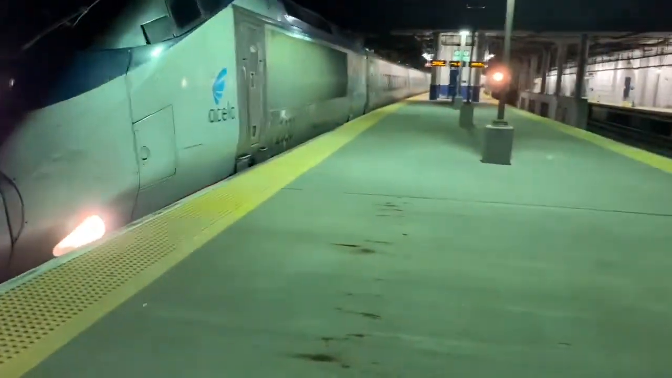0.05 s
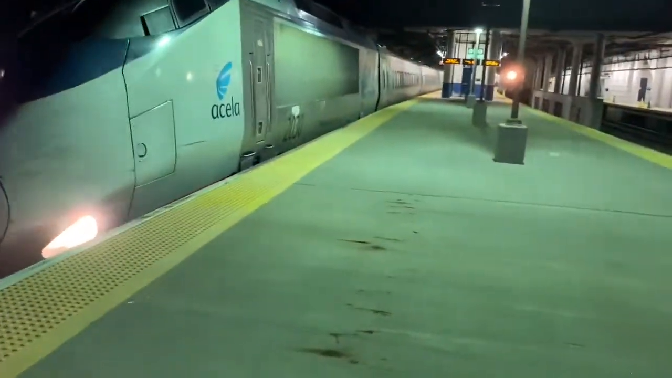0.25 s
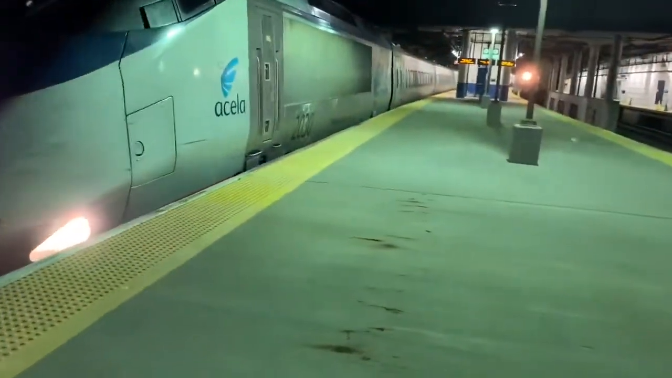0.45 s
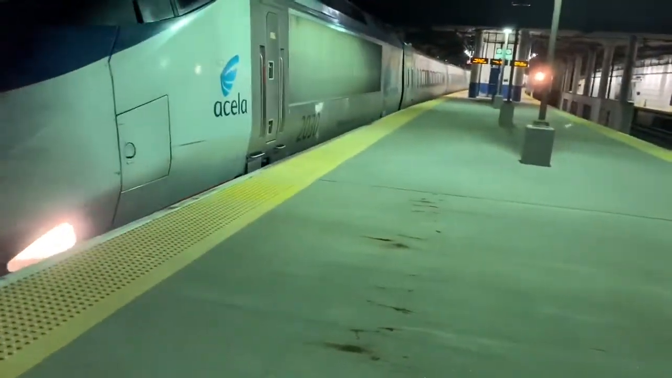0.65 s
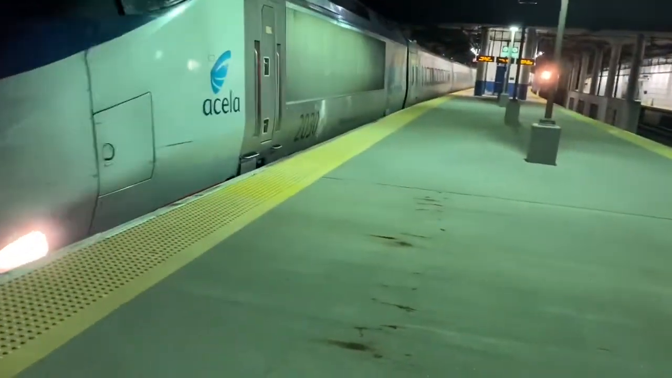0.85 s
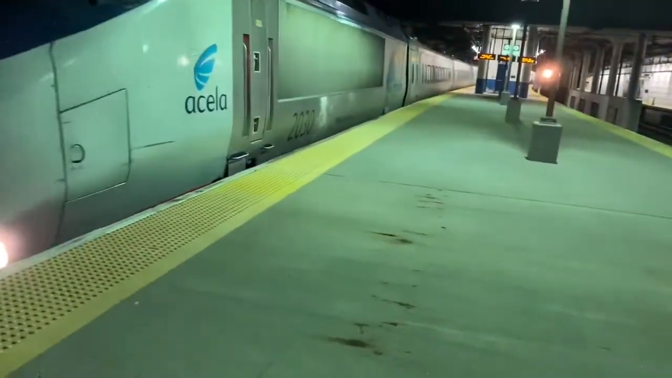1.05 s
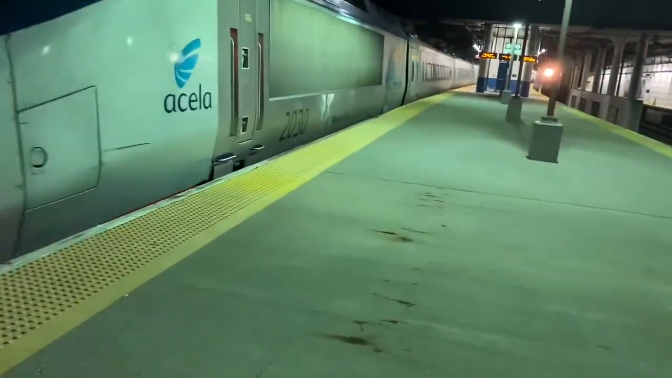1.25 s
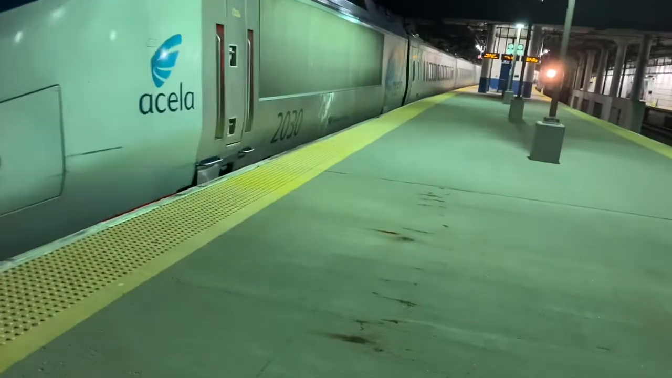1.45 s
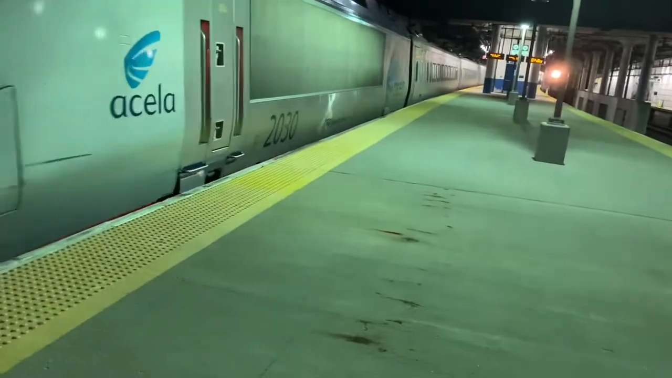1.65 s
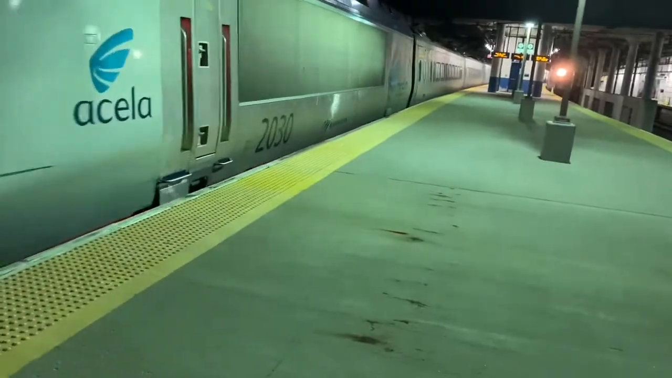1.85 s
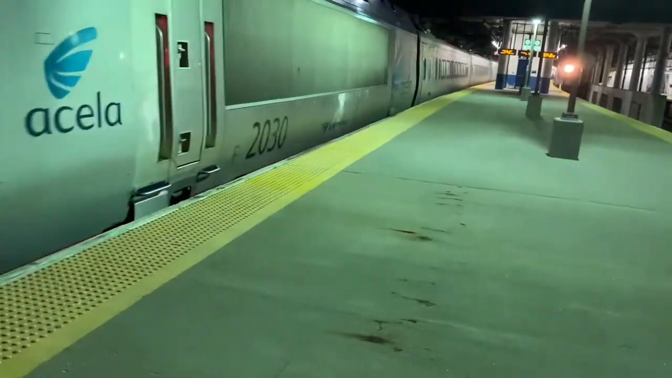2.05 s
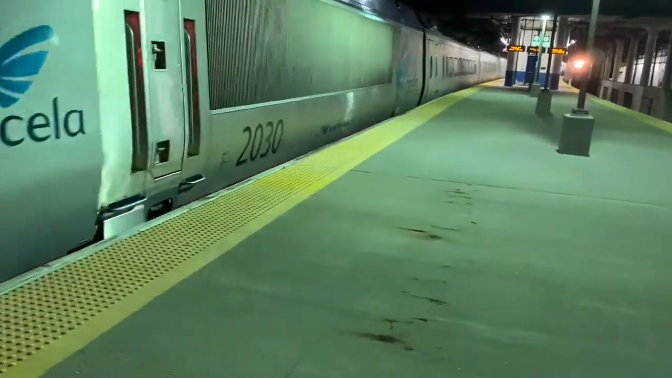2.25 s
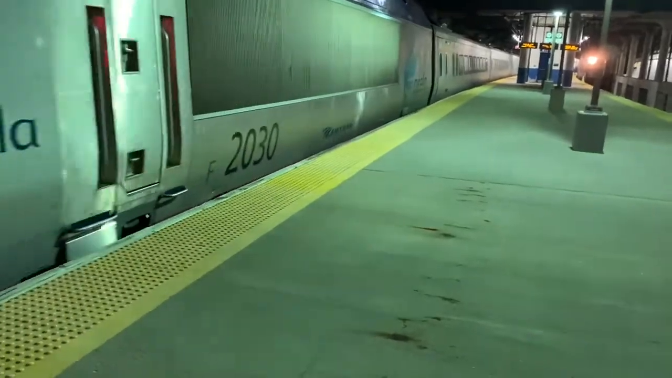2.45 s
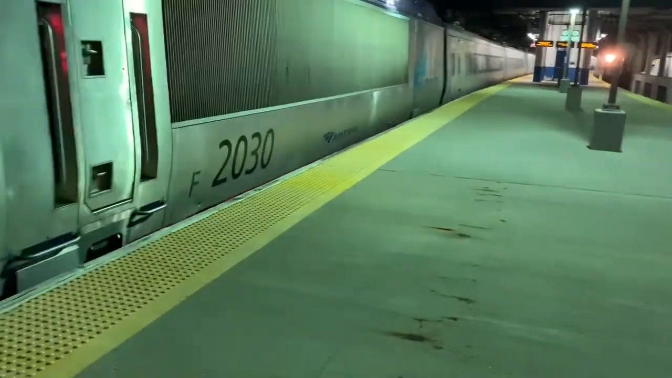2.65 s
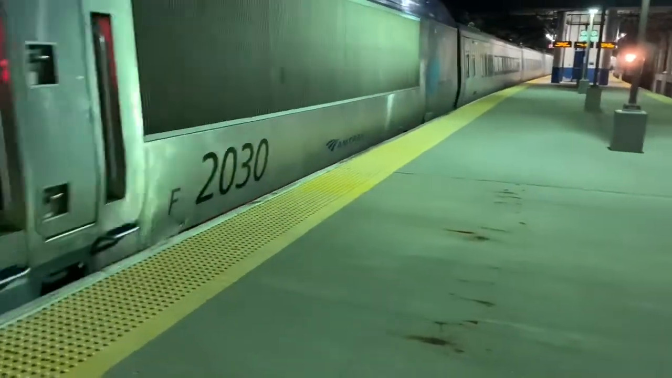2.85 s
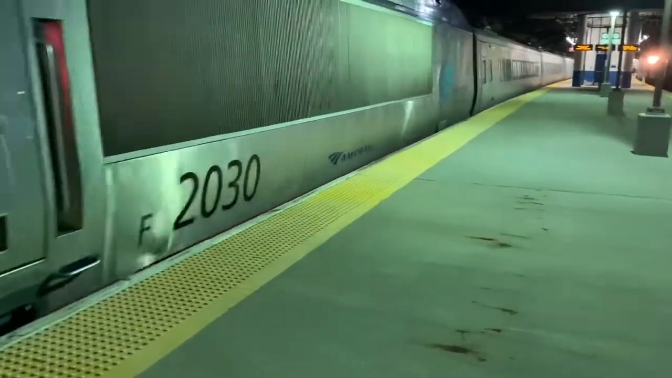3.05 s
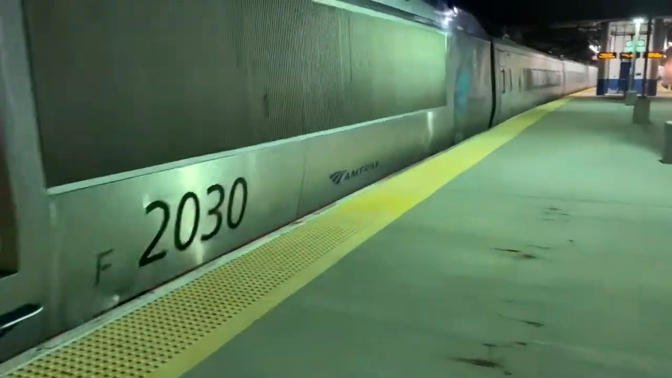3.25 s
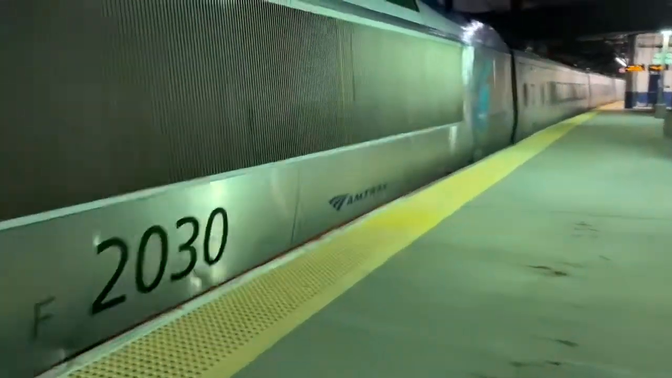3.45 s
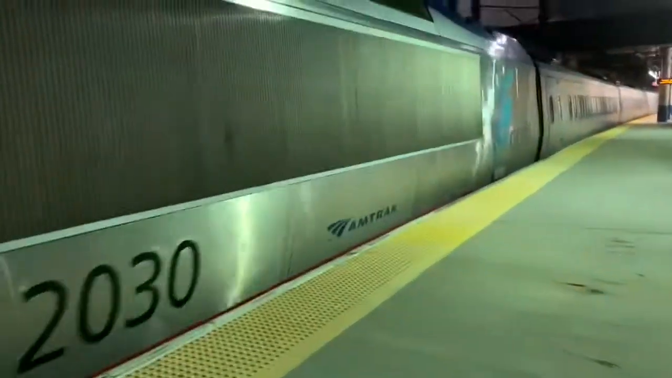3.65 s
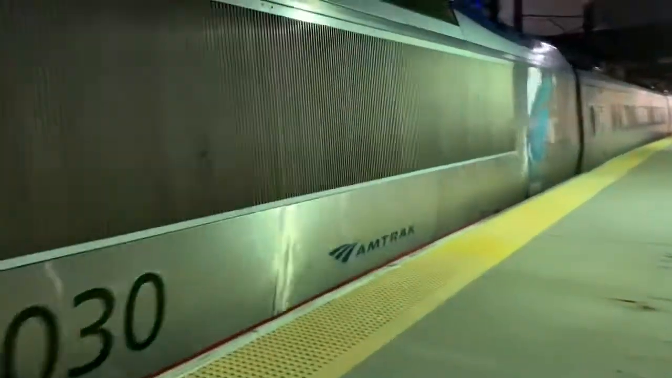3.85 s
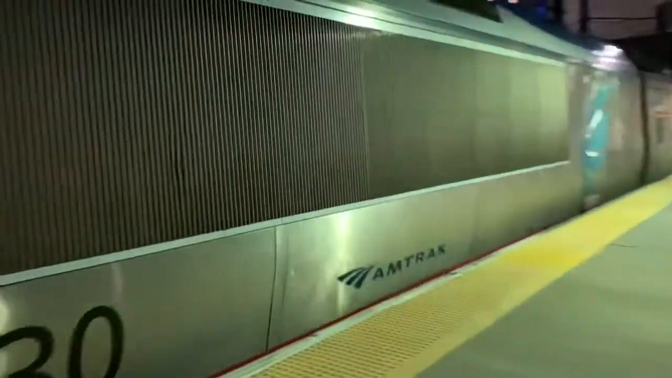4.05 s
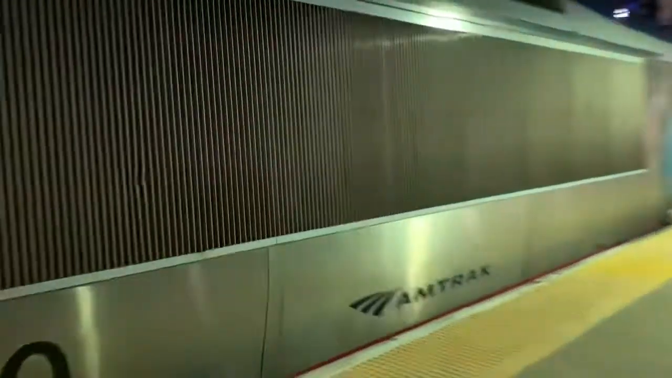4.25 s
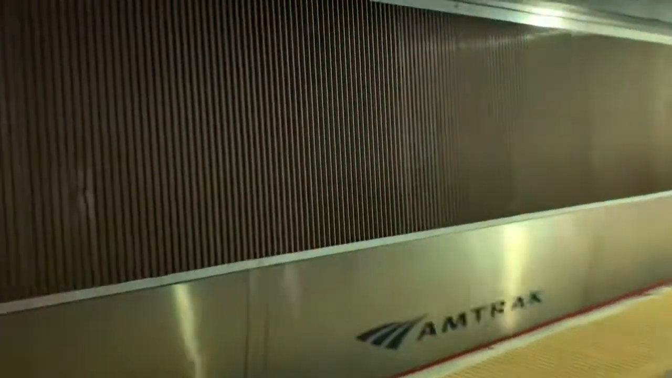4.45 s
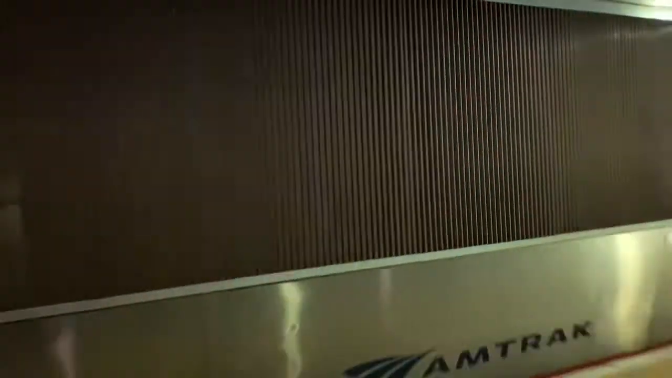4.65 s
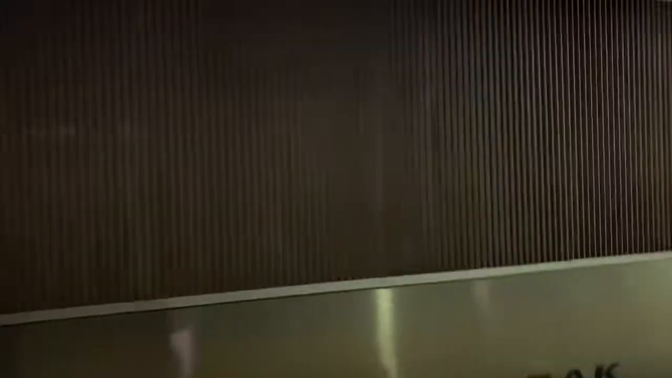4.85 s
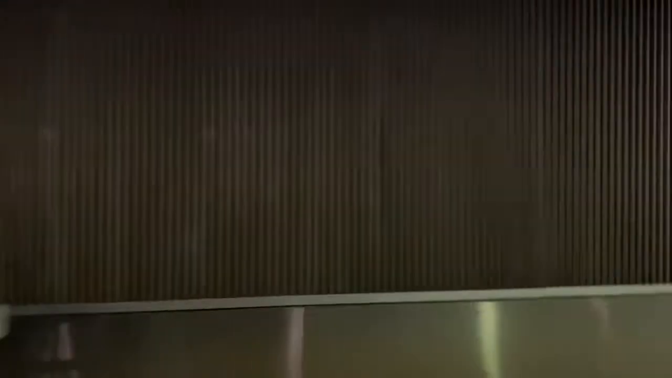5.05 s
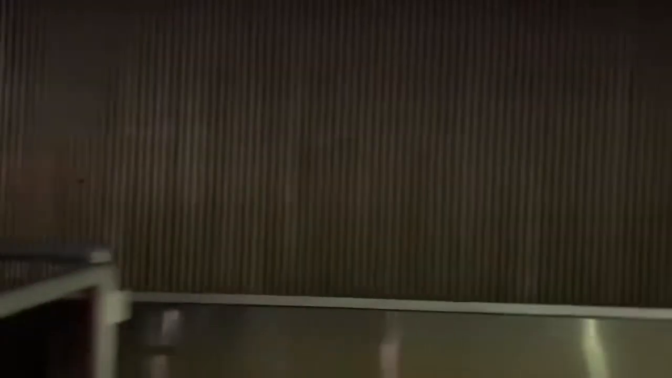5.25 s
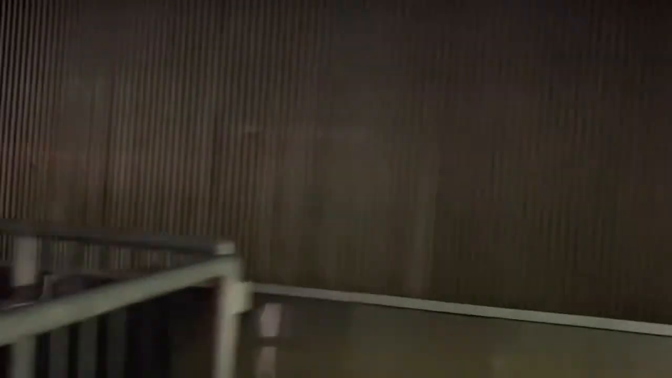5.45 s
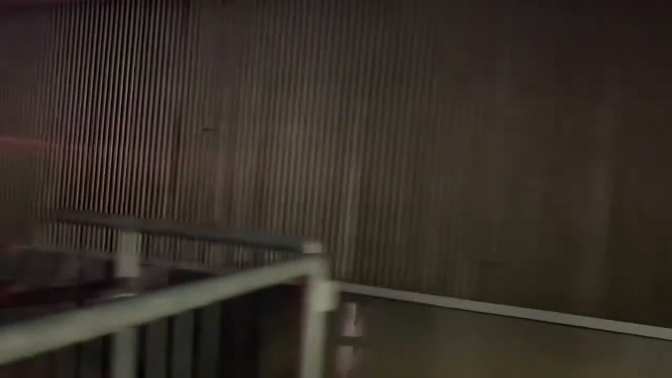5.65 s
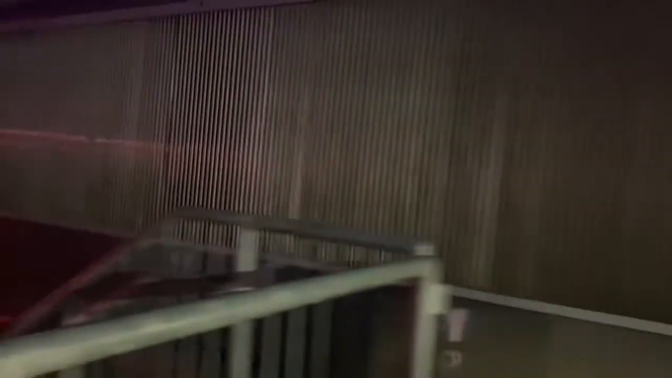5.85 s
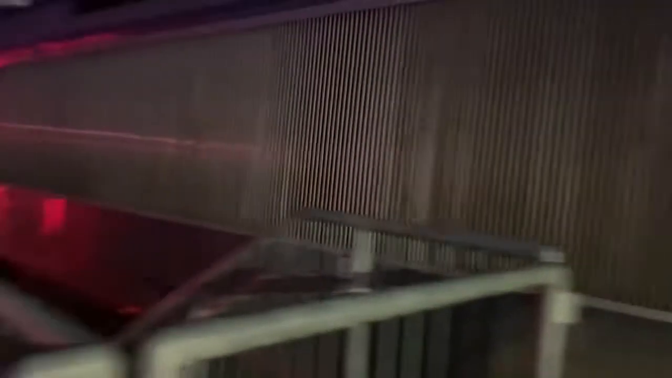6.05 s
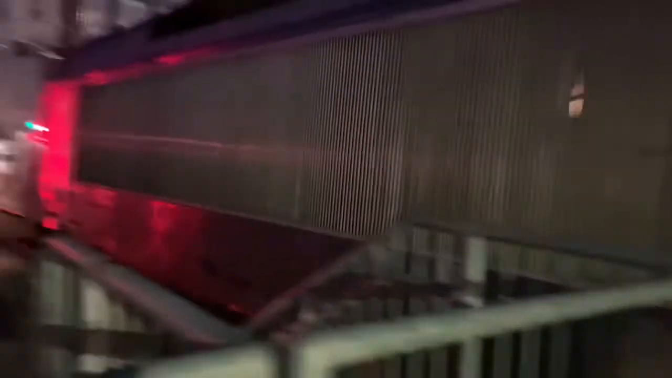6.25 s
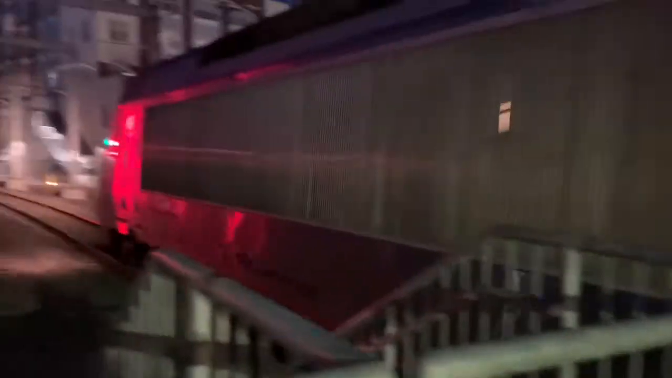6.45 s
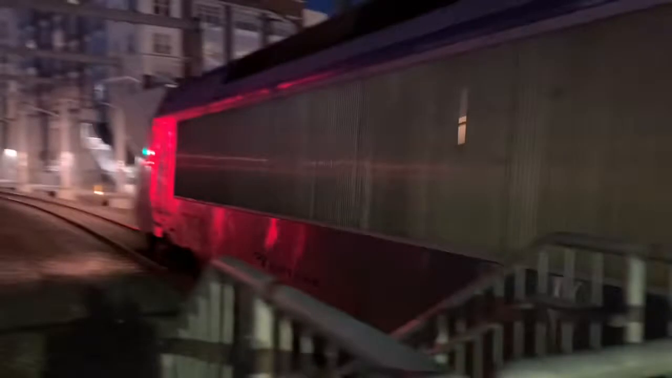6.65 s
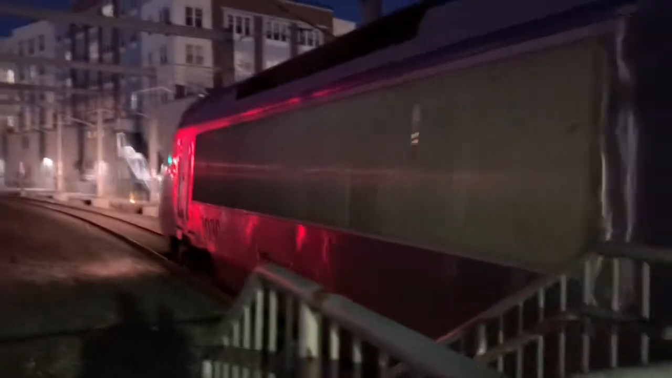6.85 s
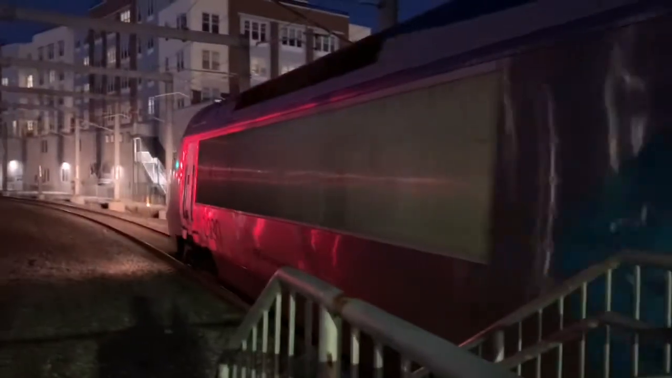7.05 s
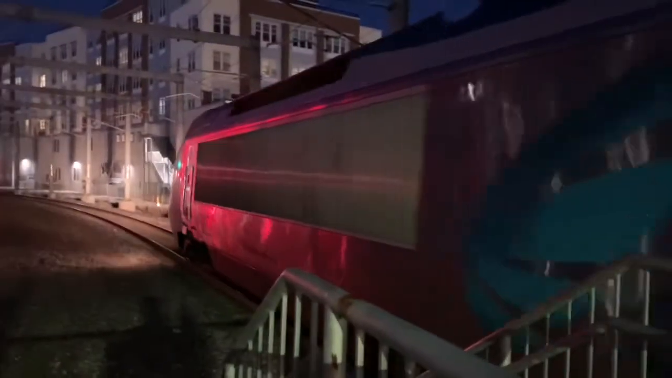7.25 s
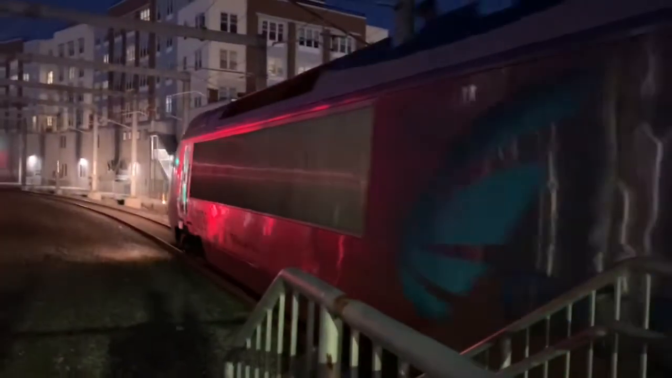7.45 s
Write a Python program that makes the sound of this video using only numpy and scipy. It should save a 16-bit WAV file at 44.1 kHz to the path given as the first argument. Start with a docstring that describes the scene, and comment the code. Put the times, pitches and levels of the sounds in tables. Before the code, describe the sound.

An electric train's power car rolls past a platform: low hum cuts out, cooling fans wind up to a loud wavering drone, airy roar swells, then fades.

```python
"""A transformer's hum drops away as an electric train's power car pulls past a phone on a platform.
Inverters sing, and cooling fans run up to a drone: each tone is a few wavering sine waves on one pitch.
Fan air, rumble and wheel roar are coloured noise that swells as each opening or part goes by.
Soft bumps and brief wheel moans are narrow bands of noise; the station echoes the tones, bumps and moans."""
import sys
import numpy as np
from scipy import signal
from scipy.io import wavfile
from scipy.ndimage import uniform_filter1d, map_coordinates

SR = 44100
rng = np.random.default_rng(int(sys.argv[2]) if len(sys.argv) > 2 else 0)


def store_pcm(level_fs):
    """Save levels as 16-bit WAV."""
    pcm = np.round(np.clip(level_fs, -1, 1) * 32767).astype(np.int16)
    wavfile.write(sys.argv[1], SR, np.atleast_2d(pcm).T)


N = 331191
TIME = np.arange(N) / SR
SPEED_M_S = 4.0  # the car rolls by at a steady speed
MAIN_FAN_TOP_S = 3.63  # when the largest fan reaches its top speed


def undb(db):
    """Turn decibels into a gain to multiply by."""
    return 10 ** (np.asarray(db) / 20)


def ramp(start_s, duration_s):
    """Rise evenly from 0 to 1, then stay there."""
    return np.clip((TIME - start_s) / duration_s, 0, 1)


def bell(centre_s, length_s):
    """Swell smoothly from 0 to 1 and back."""
    return np.exp(-(2 * (TIME - centre_s) / length_s) ** 2)


def swells(rows):
    """Add up smooth level changes in dB, from rows of centre_s, length_s, change_db."""
    return sum(change_db * bell(centre_s, length_s) for centre_s, length_s, change_db in rows)


def stereo(mid, side):
    """Make left and right from what they share and what they do not."""
    return np.array([mid + side, mid - side])


def walk(rate_hz):
    """Wander at random: levels held for 1 / rate_hz seconds, then smoothed twice."""
    hold = int(SR / rate_hz)
    held = rng.standard_normal(8192)[np.arange(N) // hold]
    smooth = uniform_filter1d(uniform_filter1d(held, hold), hold)
    return 1.196 * smooth  # brings the spread back near 1


def patches(rows, columns):
    """A smooth random pattern over frequency and time, spread near 1, with one cell per unit of each."""
    field = rng.standard_normal((256, 256))
    return 1.08 * map_coordinates(field, np.broadcast_arrays(rows, columns), order=1, mode="wrap")


def passing(sources, kind):
    """Level in dB of sources carried past: weaker by 1 / distance, and shaded by the car's body."""
    # extra loss as a source moves off; a negative one makes it fade less: kind of source: loss [dB per m]
    shade_db_per_m = {"roar": 0.77, "duct": 0.98, "hiss": 1.0, "sizzle": 1.9, "nose": 2.5, "wash": 3,
                      "gear": 0.3, "boom": 0.2, "fan": 0.6, "blower": -0.3, "whirr": 0.5, "inverter": -0.5}
    power = 0
    for abreast_s, nearest_m, level_db in sources:
        distance_m = np.hypot(SPEED_M_S * (TIME - abreast_s), nearest_m)
        shaded_db = level_db - shade_db_per_m[kind] * (distance_m - nearest_m)
        power = power + (undb(shaded_db) * nearest_m / distance_m) ** 2
    return 10 * np.log10(power)


def turbulence(colour, alongside, ahead_side_db, tilt_db, flicker_db, wisps_db, skirt_db):
    """Coloured stereo noise of rms 1, whose width moves to the colour's own as alongside goes to 1."""
    frame = 2048  # samples in each short slice
    hz, frame_s, spectra = signal.stft(rng.standard_normal((2, N)), SR, nperseg=frame)
    points_hz, colour_db, side_db = np.transpose(colour)
    octave, points = np.log2(hz + 1)[:, None], np.log2(points_hz)
    near, tilt_db = np.interp(frame_s, TIME, alongside), np.interp(frame_s, TIME, tilt_db)
    # beyond the table's ends the sound falls by skirt_db per octave; the tilt is in dB per octave too
    outside = np.abs(octave - np.clip(octave, points.min(), points.max()))
    shape_db = np.interp(octave, points, colour_db) - skirt_db * outside
    gain = undb(shape_db + tilt_db * (octave - points.mean()))
    gain = gain / np.sqrt(np.sum(gain ** 2, axis=0))
    # the power is shared between centre and sides
    width_db = near * np.interp(octave, points, side_db) + (1 - near) * ahead_side_db
    angle = np.arctan(undb(width_db))
    gains = gain * np.array([np.cos(angle), np.sin(angle)])
    # eddies make half-octave bands flicker
    eddies_db = flicker_db * patches(2 * octave, 22 * frame_s)
    # narrow bands get louder and softer at random from moment to moment
    ripple_db = wisps_db * np.array([patches(hz[:, None] / 70, 9 * frame_s) for _ in range(2)])
    shaped = spectra * gains * undb(eddies_db + ripple_db)
    mid, side = signal.istft(shaped, SR, nperseg=frame)[1][:, :N]
    sound = stereo(mid, side)
    return sound / sound.std()


def rush(hz, width_hz, db, width):
    """A narrow band of air noise around a moving pitch, made by wandering a tone's size and phase."""
    mid, side = (walk(width_hz) + 1j * walk(width_hz) for _ in range(2))
    tone = np.exp(2j * np.pi * np.cumsum(hz) / SR)
    return undb(db) * np.real(stereo(mid, width * side) * tone)


def whine(hz, db, orders, scatter, flutter_hz, width):
    """Partials on one pitch; reflections off the moving car make each waver, the higher ones more."""
    phase, out = 2 * np.pi * np.cumsum(hz) / SR, 0
    for multiple, partial_db in orders:
        order = round(multiple)
        spread = scatter * order
        mid, side = (walk(flutter_hz) + 1j * walk(flutter_hz) for _ in range(2))
        centre = (1 + spread * mid) / np.sqrt(1 + 2 * spread ** 2)
        paths = stereo(centre, width * min(order, 2) * side)
        out = out + undb(partial_db) * np.real(paths * np.exp(1j * order * phase))
    return np.sqrt(2) * undb(db) * out


def run_up(top_hz, top_s, octaves_per_s, full_db):
    """Pitch and level of a fan that gets louder as it gains speed; the passing bends its pitch down."""
    car_abreast_s, car_distance_m, sound_m_s = 5.35, 5.58, 343  # for the car's middle
    # the blade-passing pitch climbs by a steady ratio until top_s
    octaves = octaves_per_s * np.minimum(TIME - top_s, 0)
    along_m = SPEED_M_S * (TIME - car_abreast_s)
    doppler = 1 - SPEED_M_S / sound_m_s * along_m / np.hypot(along_m, car_distance_m)
    return top_hz * 2 ** octaves * doppler, full_db + 10.5 * octaves  # 10.5 dB per octave


def grilles():
    """Levels in dB of the roar, duct wash, hiss and main fan tone that leave the passing air openings."""
    # air openings: abreast_s [s], nearest_m [m], roar_db, duct_wash_db, hiss_db, main_fan_tone_db [dB]
    openings = [(3.923, 1.675, -19, -17, -31.5, -21.5), (5.548, 3.51, -22.5, -19.5, -35, -22.5)]
    return [passing([(abreast_s, nearest_m, levels[k]) for abreast_s, nearest_m, *levels in openings], kind)
            for k, kind in enumerate(("roar", "duct", "hiss", "fan"))]


def main_fan():
    """Pitch and level of the largest fan, with the swells and the throb of its drone."""
    # the drone swells and dips as the car slides past: centre_s [s], length_s [s], change_db [dB]
    drone_swells = [(2.85, 0.29, 5), (3.13, 0.16, 14), (3.47, 0.078, 7), (3.66, .2, 2.5), (4.11, 0.086, -1),
                    (4.2, 0.11, 4.5), (4.295, 0.2, 11.5), (4.44, .08, 5.5), (4.72, 0.47, 4.5),
                    (5.0, 0.12, -9), (5.16, 0.06, 7.5), (5.3, 0.053, -9), (5.65, 0.23, 6),
                    (5.88, 0.16, 5.5), (5.998, 0.42, 5.5), (6.157, 0.12, 3.5), (6.37, 0.082, -24),
                    (6.64, 0.14, 1), (6.92, 0.12, -14)]
    # it throbs while the grilles are alongside
    throb_hz, throb_db, throb_s, throb_for_s = 9.7, 3, 4.71, 1.1
    beat = np.cos(2 * np.pi * throb_hz * (TIME - throb_s))
    drone_db = grilles()[-1] + swells(drone_swells) + throb_db * bell(throb_s, throb_for_s) * beat
    return run_up(top_hz=415.2, top_s=MAIN_FAN_TOP_S, octaves_per_s=0.57, full_db=drone_db)


def thuds():
    """Soft, low bumps of the running gear, each a short swell of narrow noise."""
    # bumps: centre_s [s], length_s [s], pitch_hz [Hz], level_db [dB]
    bumps = [(1.307, 0.08, 190, -31.5), (1.72, 0.15, 240, -34), (1.896, 0.12, 230, -34)]
    return sum(bell(centre_s, length_s) * rush(pitch_hz * np.ones(N), 70, level_db, width=0.22)
               for centre_s, length_s, pitch_hz, level_db in bumps)


def wheels():
    """A flange rubs the rail and the wheel rings for a moment, as a narrow band of noise."""
    # brief moans: centre_s [s], length_s [s], pitch_hz [Hz], level_db [dB]
    moans = [(3.332, 0.075, 737, -25.5), (5.48, 0.47, 608, -29)]
    return sum(bell(centre_s, length_s) * rush(pitch_hz * np.ones(N), 70, level_db, width=0.47)
               for centre_s, length_s, pitch_hz, level_db in moans)


def electrics():
    """The transformer's hum gives way to the inverters' switching tones, all at fixed pitches."""
    # partials of each: multiple of the pitch [ratio], level_db [dB]
    hum_orders = [(1, -0.5), (2, -16.5), (4, -21)]
    inverter_orders = [(1, -6.5), (2, -10), (3, -15.5)]
    # the hum is loud until its load is cut, then weak and fading
    hum_hz, start_db, cut_s, release_s, drop_db, fade_db_per_s = 200.2, -32.5, 0.934, 0.11, 19, 12
    hum_db = start_db - drop_db * ramp(cut_s, release_s) - fade_db_per_s * np.maximum(TIME - cut_s, 0)
    hum = whine(hum_hz * np.ones(N), hum_db, hum_orders, scatter=0.15, flutter_hz=14, width=0.08)
    inverter_hz = 597
    inverter_db = passing([(2.34, 3.2, -45.5)], "inverter")  # abreast s, nearest m, dB
    inverters = whine(inverter_hz * np.ones(N), inverter_db, inverter_orders,
                      scatter=0.56, flutter_hz=18, width=0.17)
    return hum + inverters


def high_hiss():
    """Thin, high noise goes by with the nose; a slightly lower band carries before and after the car."""
    # colour of the nose's hiss: pitch_hz [Hz], level_db [dB per Hz, relative], side_minus_centre_db [dB]
    nose_colour = [(4270, -11, 0), (5600, -6.5, 0), (6600, -2, -2), (7230, 0, 6)]
    # where the lower hiss goes by: abreast_s [s], nearest_m [m], level_db [dB]
    far_passes = [(1.5, 2.3, -63), (7.3, 4, -55)]
    nose = turbulence(nose_colour, np.ones(N), ahead_side_db=0, tilt_db=np.zeros(N),
                      flicker_db=1.0, wisps_db=2.5, skirt_db=101)
    nose_db = passing([(2.66, 3.6, -51)], "nose")  # abreast s, nearest m, dB
    far_hz, far_width_hz = 4150, 1000
    far = rush(far_hz * np.ones(N), far_width_hz, passing(far_passes, "hiss"), width=0.8)
    return undb(nose_db) * nose + far


def running_noise():
    """Rumble of the running gear, boom under the car, air through ducts and grilles, and wheel roar."""
    # noise colours alongside: pitch_hz [Hz], level_db [dB per Hz, relative], side_minus_centre_db [dB]
    rumble_colour, boom_colour = [(33.0, -14, -5), (42.6, -1.5, -7), (50.0, -7, 6), (59, -9, -14),
                                  (73, 0.5, -1.5), (96.5, 4.5, 4.5), (112.6, -8, 9)], [(113.6, -1.5, 7.5), (162, -0.2, 30), (198, 0.7, 18),
                                                  (242, 0.8, 13.5)]
    duct_colour, roar_colour = [(226, -2, -2), (263, 3, -7.5), (305, 5, -14), (393, 5.5, -18.5),
                                (480, -4.5, -22), (514, 2.5, -23), (531, -29, -16)], [(502, -8.5, -5), (593, -5.5, -7.5), (710, -4, -7.5),
                                              (765, -3.5, -7), (787, -2.5, -7.5), (1050, -4, -9.5),
                                              (1120, -7.5, -10.5), (1430, -8.5, -5), (1610, -8, -3.5),
                                              (1970, -13.5, -3.5), (2150, -11.5, -3.5), (2653, -17.5, -7.5)]
    hiss_colour, sizzle_colour = [(3030, -19, 3.5), (3580, -20, 7), (3860, -24.5, -1), (4450, -23.5, 0.5),
                                  (4750, -22.5, 1), (5380, -25, 4), (6330, -25.5, -1.5), (7150, -26.5, -1)], [(7400, -31, 0), (8500, -33, 13), (10600, -36.5, -10),
                                                (12000, -40, -4), (13300, -42, 12), (15300, -54, 0)]  # the sizzle is the hiss's thin top
    # running gear, hollows under the car, outlets of the sizzle: abreast_s [s], nearest_m [m], level_db [dB]
    gear_passes, hollow_passes, sizzle_vents = [(2.5, 3.9, -32.5), (3.85, 2.1, -25), (6.9, 6.6, -28)], [(3.95, 2.22, -22.5), (5.3, 2.26, -22.5)], [(3.95, 1.16, -38),
                                                                               (5.7, 3.8, -42)]
    # roar and hiss hold back, then swell near the grilles; the duct wash swells and dips:
    # centre_s [s], length_s [s], change_db [dB]
    roar_swells, duct_swells, hiss_swells = [(2.9, 1, -1.5), (3.55, 0.2, 0), (4.15, 0.24, 2), (5.4, 1, 1)], [(.5, 1, 5), (2.35, 0.6, -2),
                                                                  (4.65, 0.67, 2.5), (5.35, 0.32, -4)], [(3.1, .6, -1),
                                                                                       (3.58, .3, 1),
                                                                                       (5.55, 0.2, 0),
                                                                                       (6.3, 0.5, 1)]

    roar_db, duct_db, hiss_db, _ = grilles()
    # the rumble and boom start central, then spread to both sides
    rumble_width = ramp(start_s=0.68, duration_s=0.67)
    boom_width = 0.81 * ramp(start_s=0.99, duration_s=0.72)
    # the air is widest while the grilles are alongside
    far_width, near_width = 0.25, 1.55
    air_width = far_width + (near_width - far_width) * bell(centre_s=4.6, length_s=6.2)
    # far sound is duller, and a slow fan's wash lies lower
    far_db = roar_db - roar_db.max()
    fan_hz, _ = main_fan()
    slowness = 1 - fan_hz / fan_hz.max()

    rumble = turbulence(rumble_colour, rumble_width, ahead_side_db=-16.0, tilt_db=0.02 * far_db,
                        flicker_db=0.0, wisps_db=0.6, skirt_db=46)
    boom = turbulence(boom_colour, boom_width, ahead_side_db=-34.0, tilt_db=0.022 * far_db,
                      flicker_db=2.0, wisps_db=2.5, skirt_db=67)
    duct = turbulence(duct_colour, air_width, ahead_side_db=-19.5, tilt_db=-13 * slowness,
                      flicker_db=2.0, wisps_db=1.5, skirt_db=67)
    roar = turbulence(roar_colour, air_width, ahead_side_db=-11.0, tilt_db=0.1 * far_db,
                      flicker_db=0.58, wisps_db=3.0, skirt_db=43.0)
    hiss = turbulence(hiss_colour, air_width, ahead_side_db=4.5, tilt_db=0.19 * far_db,
                      flicker_db=0.84, wisps_db=4.3, skirt_db=132)
    sizzle = turbulence(sizzle_colour, air_width, ahead_side_db=-14.5, tilt_db=0.065 * far_db,
                        flicker_db=1.0, wisps_db=4.3, skirt_db=57)

    air = undb(roar_db + swells(roar_swells)) * roar
    air = air + undb(duct_db + swells(duct_swells)) * duct
    air = air + undb(hiss_db + swells(hiss_swells)) * hiss
    air = air + undb(passing(sizzle_vents, "sizzle")) * sizzle
    # the boom carries further along the platform than the roar
    under_car = undb(passing(gear_passes, "gear")) * rumble + undb(passing(hollow_passes, "boom")) * boom
    return under_car + air


def fan_air():
    """Breathy bands that climb with the fans, and the grille's resonance, which is highest as it goes by."""
    # air churned by the main fan: multiple of its pitch [ratio], width_hz [Hz],
    # abreast_s [s], nearest_m [m], level_db [dB]
    fan_bands = [(1.08, 43, 2.37, 3.4, -37.5), (.96, 60, 3.44, 1.6, -27.5), (2.02, 50, 3.73, 0.79, -27.5),
                 (2.01, 40, 4.22, 1.8, -30), (2, 59.97, 5.5, 6.9, -32), (2.13, 70, 7.4, 4.4, -39),
                 (5.4, 149.9, 2.8, 3.5, -40.5)]
    # the smallest fan carries clearly while the nose is far off: centre_s [s], length_s [s], change_db [dB]
    whirr_swells = [(.35, 1.1, 6.5)]
    fan_hz, _ = main_fan()
    churn = sum(rush(multiple * fan_hz, width_hz, passing([source], "wash"), width=0.25)
                for multiple, width_hz, *source in fan_bands)
    # the smallest fan whistles in a band
    whirr_full_db = passing([(2.47, 2, -43.5)], "whirr") + swells(whirr_swells)  # abreast s, nearest m, dB
    whirr_hz, whirr_db = run_up(top_hz=1750, top_s=0.65, octaves_per_s=0.22, full_db=whirr_full_db)
    whirr = rush(whirr_hz, 170, whirr_db, width=0.5)
    # the resonance rises on the approach and sinks again; its level follows the roar leaving the grilles
    grille_hz = 2354 + 442.6 * bell(centre_s=3.9, length_s=2.8)
    ring = rush(grille_hz, 440, grilles()[0] - 21.5, width=1.0)
    return churn + whirr + ring


def fans():
    """Two large cooling fans run up one after the other; a smaller blower reaches its speed first."""
    # partials of each fan: multiple of the pitch [ratio], level_db [dB]
    fan_orders, second_orders = [(1, -0.8), (2, -20.5)], [(1, 0)]
    blower_orders = [(1, 0), (2, -11)]
    # outlets of the second fan: abreast_s [s], nearest_m [m], level_db [dB]
    second_outlets = [(3.42, 1.0, -20), (5.85, 0.71, -25)]
    # the blower's tone swells and dips: centre_s [s], length_s [s], change_db [dB]
    blower_swells = [(1.27, .25, 3), (1.6, 0.45, -5), (2.42, 0.084, -14), (2.6, 0.27, 2.5),
                     (2.88, 0.14, -16), (3.4, 0.32, 6)]

    fan_hz, fan_db = main_fan()
    # a gliding tone meets its own echoes at other pitches and flutters more
    scatter = np.where(TIME < MAIN_FAN_TOP_S, 0.34, 0.17)
    # as the car leaves, echoes take over from the drone and it wavers
    scatter = scatter + ramp(start_s=6.9, duration_s=1)
    direct = whine(fan_hz, fan_db, fan_orders, scatter=uniform_filter1d(scatter, size=SR // 4),
                   flutter_hz=35.82, width=0.093)
    # the canopy's share of the tone wavers, but its level changes slowly and lingers
    canopy_db = np.interp(TIME - 0.5, TIME, uniform_filter1d(fan_db, SR))
    # it also lags in pitch, which smears the run-up
    canopy_hz = np.interp(TIME - 0.15, TIME, fan_hz)
    canopy = whine(canopy_hz, canopy_db, fan_orders, scatter=0.8, flutter_hz=20, width=0.15)

    second_hz, second_db = run_up(top_hz=383, top_s=3.73, octaves_per_s=0.54,
                                  full_db=passing(second_outlets, "fan"))
    second = whine(second_hz, second_db, second_orders, scatter=0.7, flutter_hz=33, width=0.14)

    blower_full_db = passing([(2.47, 3.5, -37.5)], "blower") + swells(blower_swells)  # abreast s, nearest m, dB
    blower_hz, blower_db = run_up(top_hz=704, top_s=1.62, octaves_per_s=0.35, full_db=blower_full_db)
    blower = whine(blower_hz, blower_db, blower_orders, scatter=1.3, flutter_hz=30, width=0.23)
    blower = blower * ramp(start_s=1.03, duration_s=0.1)
    return direct + undb(-11.5) * canopy + second + blower


def station(sound, echo_db):
    """Diffuse echoes from the canopy and the walls: the sound is smeared by fading noise."""
    t60_s = 0.86  # time for the echoes to fall by 60 dB
    t = TIME[:SR]
    tail = rng.standard_normal((2, SR)) * undb(-60 * t / t60_s) * (t > 0.02)
    mid, side = tail / np.sqrt(np.sum(tail[0] ** 2))
    echoes = signal.fftconvolve(sound, stereo(mid, 0.3 * side), axes=1)[:, :N]
    return sound + undb(echo_db) * echoes


def scene():
    """The machinery's tones, with their echoes, inside the rush of the passing car."""
    echoing = station(thuds() + wheels() + electrics() + fans(), echo_db=-16.5)
    return high_hiss() + running_noise() + fan_air() + echoing


def record(dry):
    """The phone drops the deepest bass and cuts the top."""
    bass_hz, top_hz = 37, 15700
    fade_in = np.minimum(TIME / 0.005, 1)
    thin = signal.sosfilt(signal.butter(8, bass_hz, "high", fs=SR, output="sos"), dry * fade_in)
    return signal.sosfilt(signal.ellip(8, 0.2, 70, top_hz, fs=SR, output="sos"), thin)


dry = scene()
out = record(dry)
store_pcm(out)
```